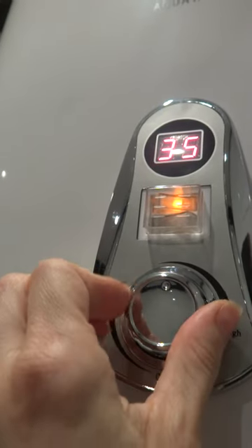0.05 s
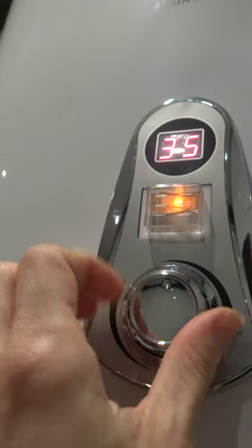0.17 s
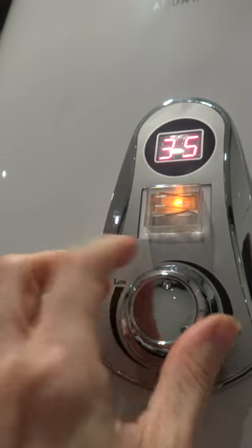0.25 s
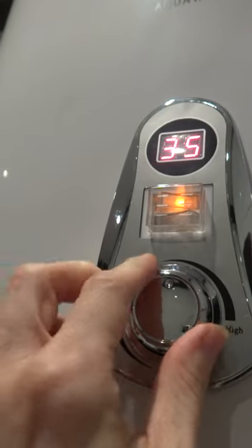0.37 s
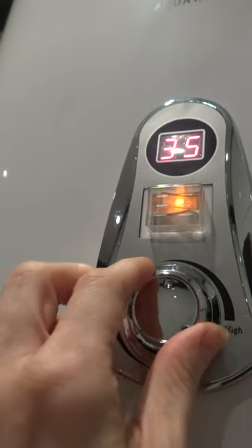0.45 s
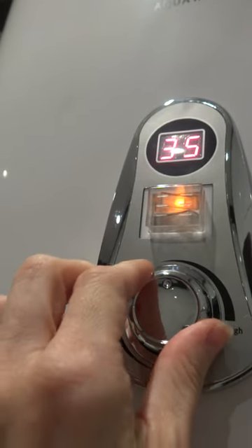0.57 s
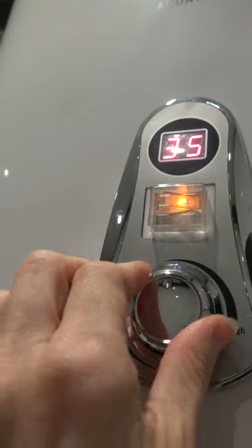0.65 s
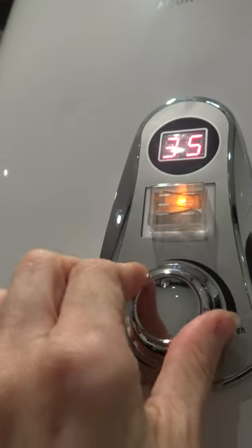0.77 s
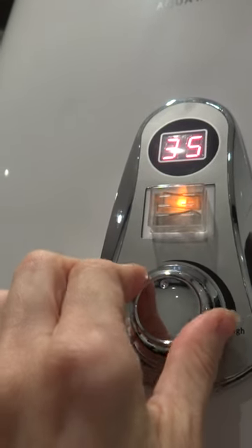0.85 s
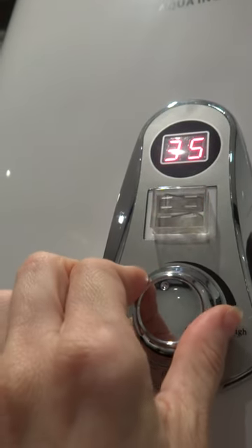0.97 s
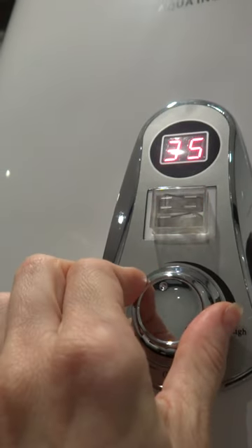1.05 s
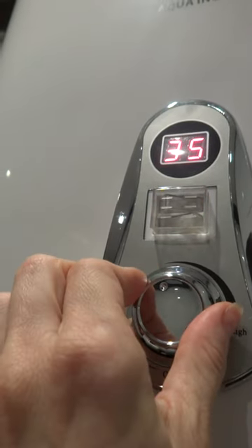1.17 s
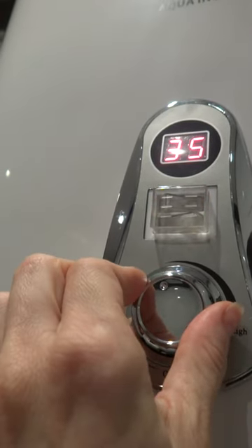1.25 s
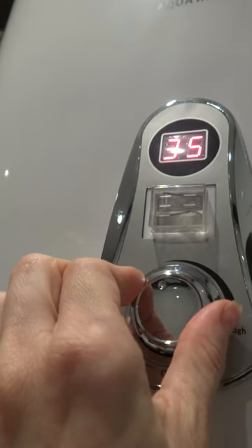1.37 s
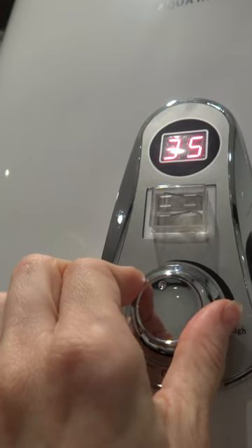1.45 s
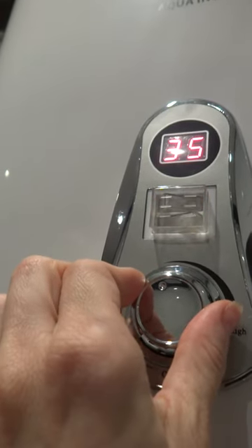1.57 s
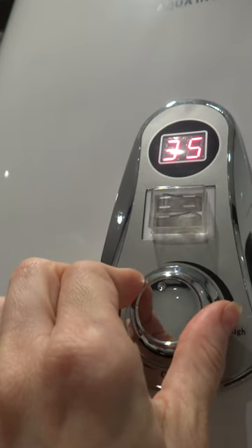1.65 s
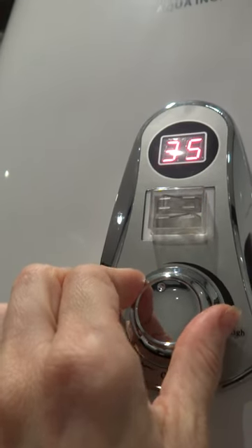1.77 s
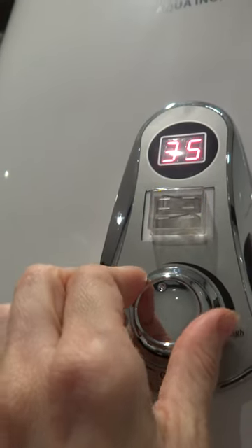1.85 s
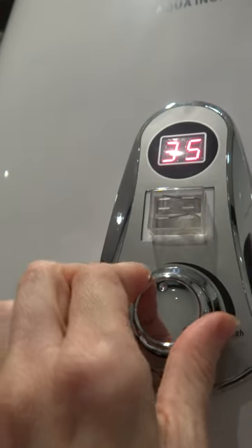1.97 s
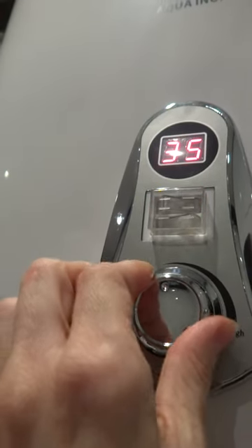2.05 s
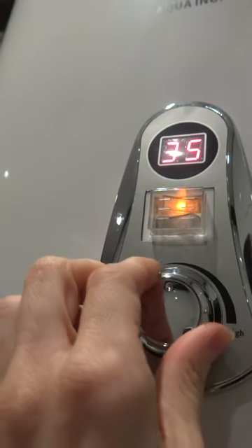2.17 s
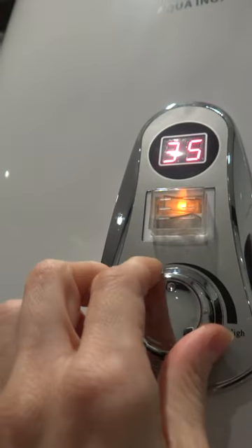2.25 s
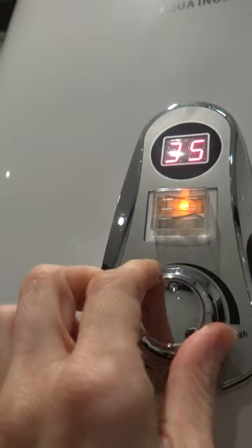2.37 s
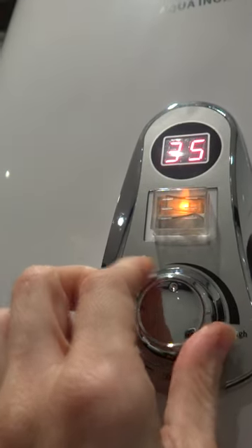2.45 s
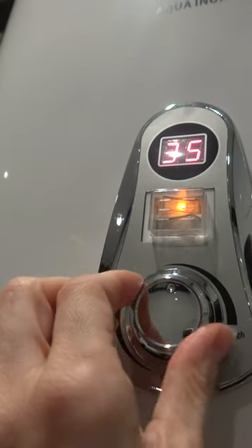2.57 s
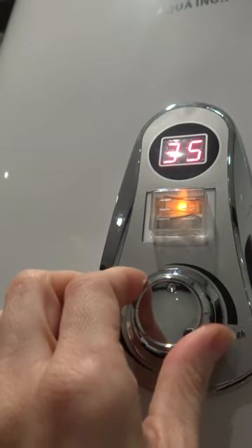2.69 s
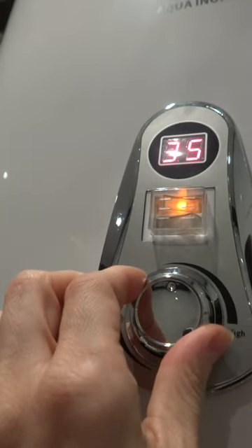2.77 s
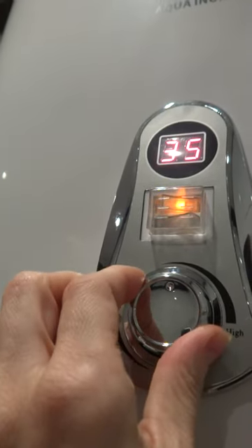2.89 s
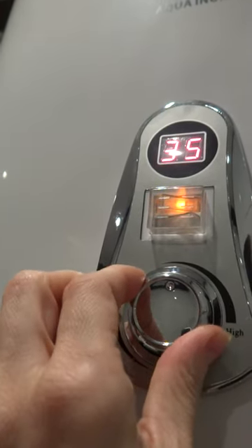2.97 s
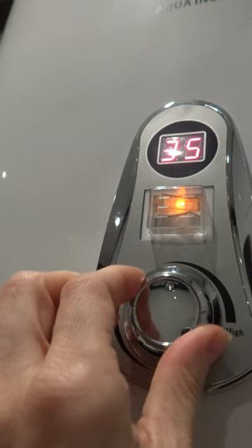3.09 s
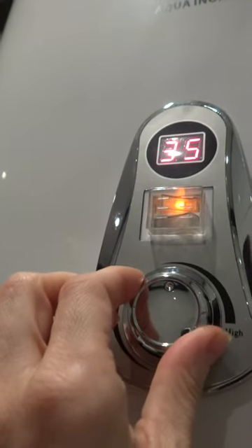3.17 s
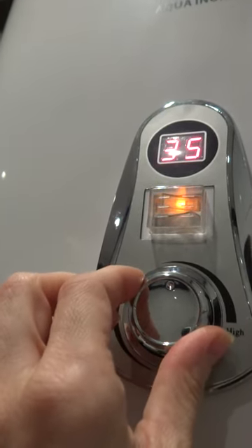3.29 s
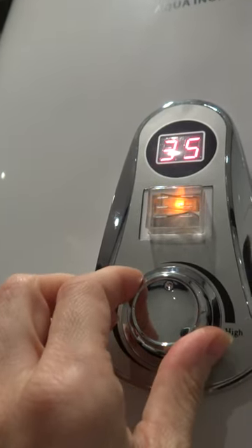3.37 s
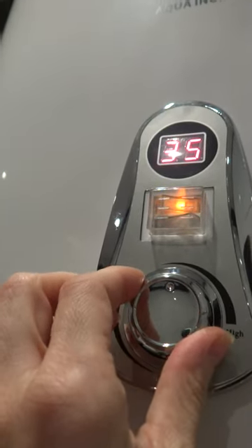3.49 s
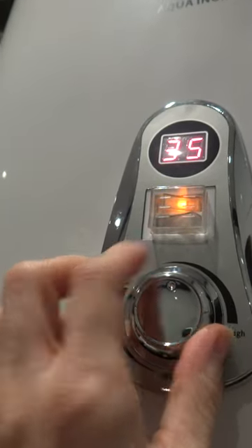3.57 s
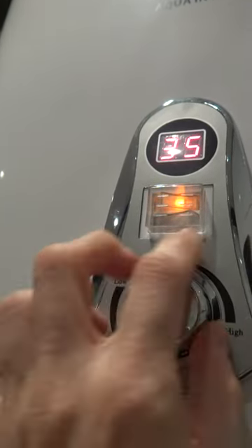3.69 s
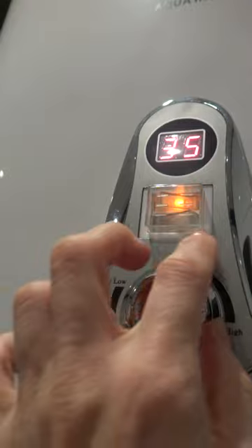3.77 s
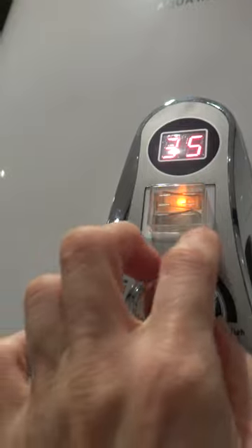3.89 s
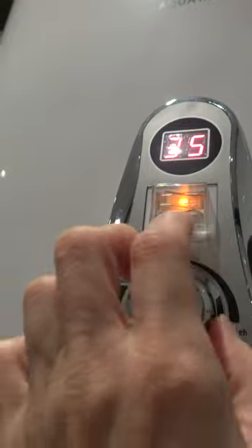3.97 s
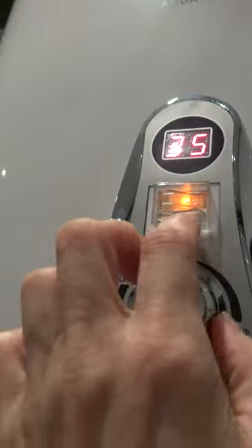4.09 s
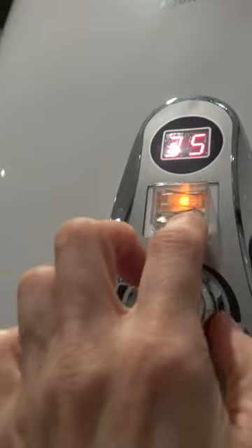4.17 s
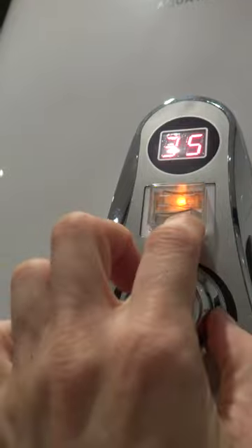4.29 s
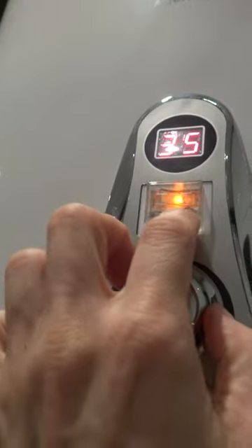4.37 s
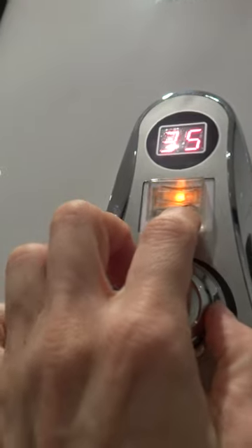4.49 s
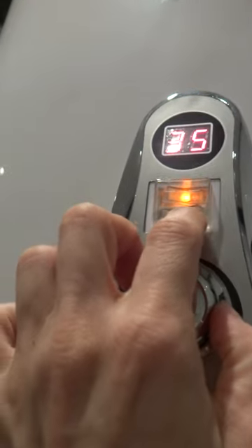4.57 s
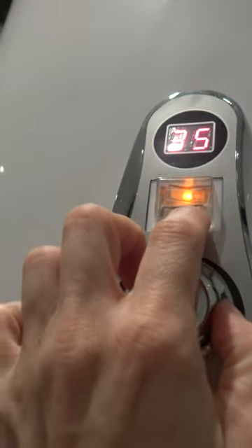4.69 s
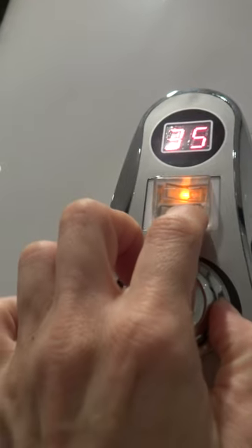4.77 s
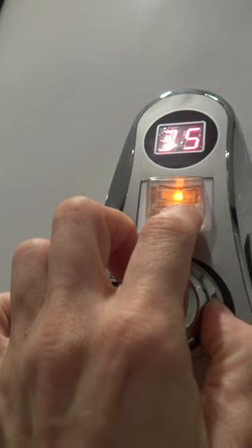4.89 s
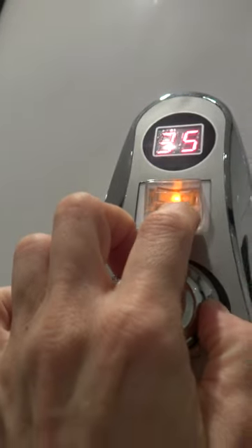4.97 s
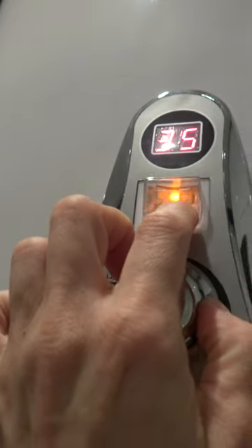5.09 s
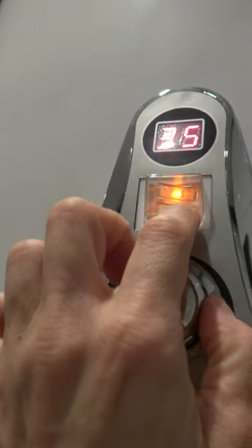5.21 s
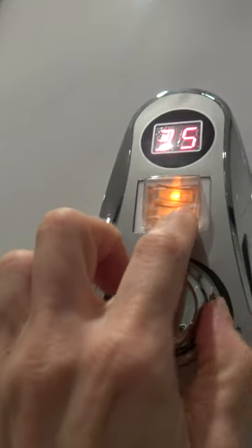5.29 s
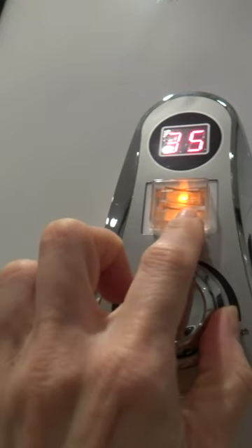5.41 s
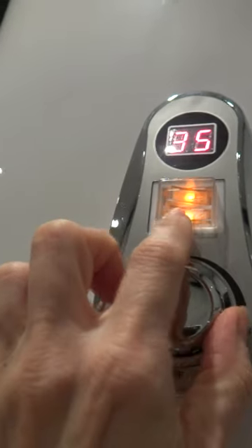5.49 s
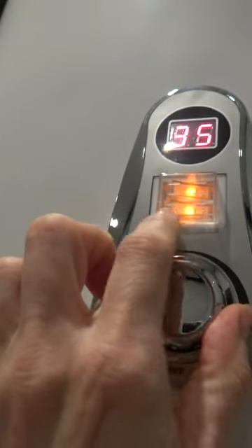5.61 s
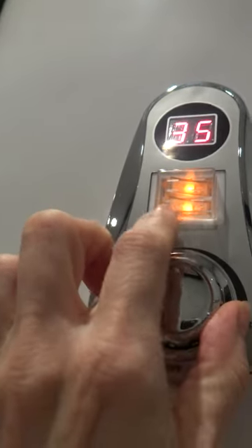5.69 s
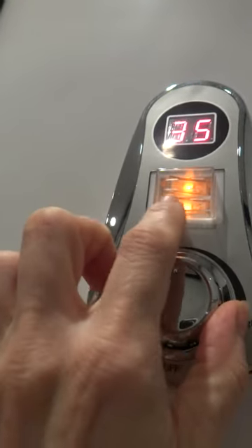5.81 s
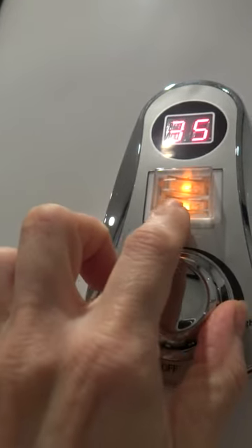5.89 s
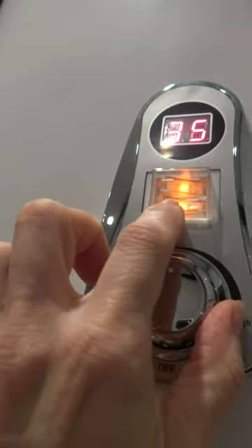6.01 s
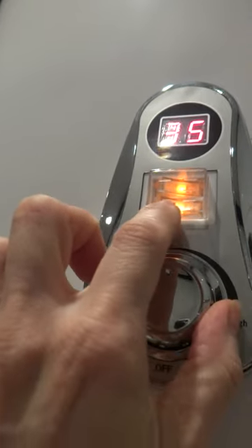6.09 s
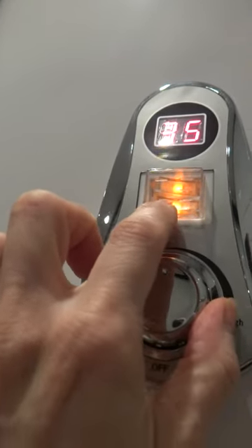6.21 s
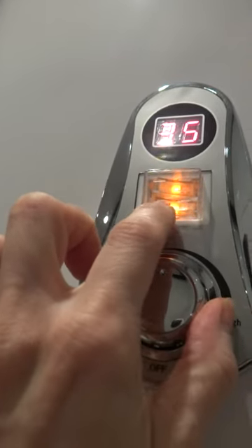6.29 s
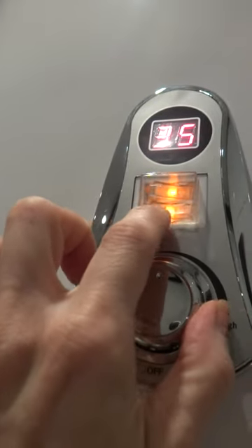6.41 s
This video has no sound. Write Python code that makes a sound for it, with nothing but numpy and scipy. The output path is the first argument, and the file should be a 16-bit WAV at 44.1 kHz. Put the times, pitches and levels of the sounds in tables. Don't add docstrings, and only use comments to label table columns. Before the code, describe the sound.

Close up in a hard, tiled room, fingers softly knock and rub a hollow plastic panel. A knob snaps off with a sharp bright click, then snaps on about a second later. After quiet fumbling and small creaks, a rocker switch gives a heavier, far more ringing clack. A distant clock ticks once a second under faint microphone hiss.

```python
import sys
import numpy as np
from scipy import signal
from scipy.fft import rfft, irfft, next_fast_len
from scipy.io import wavfile
from scipy.ndimage import uniform_filter1d

SR = 44100
rng = np.random.default_rng(int(sys.argv[2]) if len(sys.argv) > 2 else 0)


def pcm_store(signal):
    levels = np.round(np.clip(np.atleast_2d(signal), -1, 1) * 32767)
    wavfile.write(sys.argv[1], SR, levels.astype(np.int16).T)


def invert_db(x):
    u = np.asarray(x, float) / 20
    return 10 ** u


N = 284445

# start in seconds, direct level in dB, rise in seconds, rattle in seconds.
SNAPS = [
    (0.9781, -20.5, 0.00051, 0.0087),
    (2.1994, -16, 0.00041, 0.0048),
    (4.943, -17, 0.00034, 0.006),
]
# frequency in Hz, level in dB per Hz.
ROCKER_COLOUR = [(180, -57.5), (300, -29), (478, -16.5), (913, -14), (1110, -3.5), (1380, -14.5),
                 (1770, -8), (3390, -14), (4970, -31), (8460, -29), (15900, -44)]
# frequency in Hz, width in Hz, level in dB.
NAIL = [(3000, 780, 8), (6640, 1600, 7.5), (11000, 5300, 1.5)]
# frequency in Hz, left over right in dB.
HIT_LEAN = [(60, -1), (180, -0.5), (550, -5), (1400, -6), (3000, -4.5), (6000, -2.5), (10000, -1.4),
            (15000, -1)]
# frequency in Hz, left over right in dB.
RING_LEAN = [(60, -1), (150, 0), (380, -1), (700, -3.5), (1290, -4.5), (2380, -3), (4400, -2.5),
             (8100, -.7), (15000, 0)]
HISS_TOP_HZ = 15930


def unit(x):
    return x / np.sqrt(np.mean(x ** 2) + 1e-24)


def along(points, hz):
    f, v = np.transpose(points)
    return np.interp(np.log(hz + 1), np.log(f + 1), v)


def filtered(x, response):
    m = next_fast_len(x.shape[-1] + 8192)
    spectrum = rfft(x, m) * response(np.fft.rfftfreq(m, 1 / SR))
    return irfft(spectrum, m)[..., :x.shape[-1]]


def modes(table):
    return lambda f: sum((-1) ** k * invert_db(db) * 1j * f * w / (c * c - f * f + 1j * f * w)
                         for k, (c, w, db) in enumerate(table))


def blended(peaks, colour, colour_db):
    damped = [(c, np.hypot(w, 20 + (c / 580) ** 2), db - 6.5) for c, w, db in peaks]
    return lambda hz: np.hypot(abs(modes(damped)(hz)), invert_db(along(colour, hz) + colour_db))


def leaned(x, lean, late=0):
    # frequency in Hz, phase in radians by which the left leads.
    port_lead = [(60, 0), (430, -0.7), (1100, -0.45), (1700, -0.1), (3700, 0.15), (8000, 0)]

    def response(hz):
        gain = invert_db(np.outer([.5, -.5], along(lean, hz)))
        return gain * np.exp(1j * late * np.outer([.5, -.5], along(port_lead, hz)))
    return filtered(x, response)


def spread(pair, alike, lean, late=0):
    def mixing(hz):
        turn = np.arccos(np.clip(along(alike, hz), -1, 1)) / 2
        return np.array([np.cos(turn), np.sin(turn)])
    mid, side = filtered(pair, mixing)
    return leaned(np.array([mid + side, mid - side]), lean, late)


def add(out, s, x):
    i = round(s * SR)
    out[..., i:i + x.shape[-1]] += x[..., :N - i]


def strokes(rows, rise, fall):
    t = np.arange(N) / SR
    return sum(invert_db(db - rise * np.maximum(s - t, 0) - fall * np.maximum(t - s - hold, 0)) for s, hold, db in rows)


def ringing(response, build, lasting):
    # frequency in Hz, decay by 60 dB in seconds.
    room_t60 = [(100, 0.28), (260, 0.59), (700, 0.69), (1840, 0.61), (4850, 0.55), (12800, 0.45)]
    # frequency in Hz, left-right likeness.
    ring_alike = [(60, .95), (350, .8), (800, .95), (2000, .96), (6000, .94), (15000, .99)]
    ragged_db = 1.8
    n = SR * 3 // 5
    noise = filtered(rng.standard_normal((2, n)), lambda hz: response(hz) * (hz < HISS_TOP_HZ))
    pair = spread(noise, ring_alike, RING_LEAN, late=1)
    hz, t, z = signal.stft(pair / np.std(pair), SR, nperseg=256)
    ragged = uniform_filter1d(rng.standard_normal(z.shape[1:]), size=4, axis=0)
    ragged = unit(uniform_filter1d(ragged, size=5, axis=1))
    decay_db = -60 * t / (lasting * along(room_t60, hz)[:, None])
    fading = signal.istft(z * invert_db(ragged_db * ragged + decay_db), SR, nperseg=256)[1][:, :n]
    return fading * (1 - np.exp(-np.arange(n) / SR / build))


def snaps():
    # frequency in Hz, width in Hz, level in dB.
    off_hit = [(814, 200, -22), (1780, 26, -2), (3500, 83, 5.5), (5230, 180, -12), (6030, 78, -8.5),
               (7430, 260, -9.5), (8220, 100, -5), (10450, 450, -11), (11970, 270, -11.5), (12500, 180, -9),
               (14200, 330, -8), (15500, 200, -28)]
    on_hit = [(875, 180, -8), (2700, 105, -14), (3502, 23, 9), (6570, 150, -10), (9640, 204, -33),
              (10380, 400, -3.5), (11250, 260, -4.5), (12960, 370, -3), (15500, 344, -30), (14400, 300, -4)]
    rocker_hit = [(1150, 270, -3.5), (1800, 71, 3.5), (2850, 1100, -2), (5900, 80, -9.5), (7300, 180, -9),
                  (7900, 79.4, -17), (9800, 98, -21), (10440, 190, -29)]
    # frequency in Hz, width in Hz, level in dB.
    off_ring = [(804, 27, 1), (988, 36, 3), (1283, 18, -4), (1746, 46, -3), (2360, 37, -7.5),
                (3200, 56, -4), (3510, 20, -1), (4470, 71, -12), (5080, 81, -10.5), (5930, 33, -18),
                (7200, 74, -15.5), (8140, 95, -16), (10430, 31, -22.5), (13400, 75, -23), (15600, 120, -38)]
    on_ring = [(1070, 110, 0.5), (1283, 16, 4), (1570, 61, -5.5), (2250, 190, -4.5), (2770, 53, -4),
               (3500, 62, -6), (3800, 110, -7), (5100, 140, -10.5), (6380, 110, -11), (9800, 27, -17),
               (10330, 440, -14), (11600, 37, -17), (12300, 153, -27), (14100, 51, -17)]
    rocker_ring = [(1120, 38, 0), (1713, 53, 5), (2240, 85, -0.5), (2360, 40, -0.5), (2800, 31, -3.5),
                   (3360, 110, -4.5), (3860, 100, -12), (4400, 39, -10), (5760, 46, -20), (7700, 28, -29),
                   (7950, 71, -25), (8250, 34, -22.5), (9500, 600, -29.5)]
    # frequency in Hz, level in dB per Hz.
    off_colour = [(35, -51), (60, -33), (379, -17.5), (921, -8), (1540, -24), (1690, -27), (3330, -10.5),
                  (4010, -23), (5070, -33), (15900, -35)]
    on_colour = [(35, -47), (60, -56), (222, -12.5), (696, -14.5), (1060, -14), (1370, -27), (3490, -15.5),
                 (7020, -32), (14100, -24), (15900, -31)]
    # ring in dB, build-up in seconds, factor on t60, broad colour in dB, loose cover in dB.
    rings = [
        (-35.5, 0.00067, 0.97, -3, -35),
        (-38.5, 0.0018, 0.97, -3, -39),
        (-19, 0.034, 0.83, -3, -20),
    ]
    # start in seconds, level in dB, t60 in seconds.
    lead_in = [
        (.9778, -50, .02),
        (2.1992, -48, .005),
        (4.94, -34.5, 0.01),
        (4.9411, -20.5, 0.0064),
    ]
    shake_s = .075

    out, t = np.zeros((2, N)), np.arange(SR // 20) / SR
    ring_t = np.arange(SR * 3 // 5) / SR
    small = lambda hz: (hz / 350) ** 2 / (1 + (hz / 350) ** 2)
    parts = zip(SNAPS, rings, (off_hit, on_hit, rocker_hit), (off_ring, on_ring, rocker_ring),
                (off_colour, on_colour, ROCKER_COLOUR))
    for (s, db, rise, rattle), (ring_db, build, lasting, diffuse_db, shake_db), hit, ring, colour in parts:
        chatter = rng.standard_normal(len(t)) * np.exp(-(t / rattle) ** 2)
        blow = 6 * np.exp(-((t - .0003) / .00006) ** 2)
        struck = filtered(chatter + blow, lambda hz: small(hz) * (modes(hit)(hz) + invert_db(-29.0)))
        envelope = (1 - np.exp(-t / rise)) * (0.13 + np.exp(-(t / rattle) ** 4)) * invert_db(-60 * t / 0.08)
        struck = struck * envelope
        add(out, s, leaned(invert_db(db) * struck / abs(struck).max() * np.ones((2, 1)), HIT_LEAN, late=1))
        shaking = 1 + invert_db(shake_db) * np.exp(-(ring_t / shake_s) ** 6)
        add(out, s, invert_db(ring_db) * shaking * ringing(blended(ring, colour, diffuse_db), build, lasting))
    for s, db, t60 in lead_in:
        tick = filtered(rng.standard_normal(len(t)), modes(NAIL + [(14000, 1400, 3.06)]))
        tick = tick * (1 - np.exp(-t / 0.00032))
        add(out, s, invert_db(db - 60 * t / t60) * tick * np.ones((2, 1)))
    return out


def tank():
    # frequency in Hz, level in dB, t60 in seconds.
    tap_notes = [(2050, -63.5, 0.32), (3350, -64.5, .35), (3950, -68, 0.26), (7000, -71, .3),
                 (11500, -69, 0.089)]
    off_notes = [(750, -51, 0.36), (946, -48.5, 0.81), (1057, -51, 0.53), (1690, -43, 0.35),
                 (3140, -55, 0.45), (3467, -53, 0.36), (5300, -56, 0.49), (7445, -61, .33),
                 (8080, -59, 0.66), (10490, -62, .36), (11760, -58, .25), (12680, -60, .29),
                 (13780, -59, .3)]
    on_notes = [(1050, -48, 0.41), (1287, -43.5, 0.41), (1186, -54, 0.27), (2720, -66, .45),
                (3460, -52, 0.46), (5233, -59, 0.55), (6508, -73, .5), (9927, -60, .34), (10550, -60, .33),
                (11930, -57, .2), (12400, -64, .4), (14100, -56, .4)]
    rocker_notes = [(1039, -35, 0.448), (1125, -36.5, 0.68), (1196, -41, 0.36), (1740, -32, .35),
                    (1910, -37, .3), (1890, -32, .25), (2132, -34.5, 0.51), (2158, -32, 0.413),
                    (2380, -31, 0.45), (2870, -49, .34), (3788, -34, 0.38)]
    note_build = [
        .002,
        .004,
        0.0035,
        0.009,
    ]
    tap_s = .436
    waver_db, waver_radians = 4, .9
    early_db, early_t60, early_from_hz = -46, .2, 4000

    out, t = np.zeros((2, N)), np.arange(SR // 2) / SR
    blows = zip([(tap_s,)] + SNAPS, (tap_notes, off_notes, on_notes, rocker_notes), note_build)
    for (s, *_), notes, build in blows:
        wander = uniform_filter1d(rng.standard_normal((2, len(notes), len(t))), size=350)
        waver, drift = uniform_filter1d(wander, size=350)
        hz, db, t60 = np.transpose(notes)[..., None]
        phase = 2 * np.pi * (hz * t + rng.random(hz.shape)) + waver_radians * unit(drift)
        ring = invert_db(db - 60 * t / t60 + waver_db * unit(waver)) * np.sin(phase)
        add(out, s, leaned(ring.sum(0) * (1 - np.exp(-t / build)) * np.ones((2, 1)), RING_LEAN, late=1))
    bright = lambda hz: invert_db(along(ROCKER_COLOUR, hz)) / (1 + (early_from_hz / (hz + 1)) ** 4)
    add(out, SNAPS[-1][0], invert_db(early_db) * ringing(bright, 0.0009, early_t60))
    return out


def thumps():
    # centre in seconds, frequency in Hz, level in dB, half length in seconds.
    flexes = [
        (0.9808, 872, -19.5, 0.0012),
        (2.198, 960, -40, 0.00061),
        (4.944, 1120, -30.5, 0.0017),
        (4.9448, 765, -32.5, 0.0018),
        (.4385, 700, -44.5, 0.0016),
        (.981, 12300, -37, 0.0017),
        (.984, 14000, -36, .0012),
        (2.2005, 10600, -33, .0008),
        (4.956, 2035, -33, .002),
    ]
    # centre in seconds, frequency in Hz, level in dB, half length in seconds.
    slaps = [(2.308, 1140, -48, 0.0016), (2.318, 1150, -48, 0.0014), (2.351, 1210, -42, 0.001),
             (2.36, 1430, -43.5, 0.0013), (2.368, 1720, -49, 0.0017), (4.9615, 2050, -22, 0.0012),
             (4.97, 1980, -25.5, 0.00052), (4.963, 1800, -31, .0006), (5.003, 1756, -25, 0.0049),
             (5.033, 1120, -28, 0.0016)]
    # centre in
    # seconds, frequency in Hz, level in dB, half length in seconds.
    chirps = [(4.2745, 2620, -58, 0.0011), (4.2745, 1500, -59, 0.0008), (4.29, 2510, -56, .005),
              (4.314, 2540, -60, 0.0043), (4.33, 2550, -59, .002), (4.362, 1900, -59, .003),
              (4.375, 2560, -56, 0.0065), (4.555, 2700, -58, 0.0025), (4.563, 2730, -67, 0.0017),
              (4.571, 2660, -52, 0.0016), (4.586, 2570, -55, 0.0014), (4.595, 2800, -61, .002),
              (4.602, 2800, -61, 0.0022), (.215, 714, -52, 0.0028), (.213, 3550, -61, .002),
              (.477, 720, -52, 0.0025), (.17, 2490, -66, .004), (.415, 1410, -55, .006),
              (3.39, 1450, -64, 0.0038), (4.346, 1480, -53.5, 0.0047), (1.37, 3180, -57, .006),
              (1.39, 3250, -58, 0.0027), (1.417, 3100, -59, .003), (5.4, 1820, -63.5, 0.0094)]
    out, t = np.zeros(N), np.arange(-SR // 100, SR // 100) / SR
    for s, hz, db, half in flexes + slaps + chirps:
        add(out, s + t[0], invert_db(db) * np.exp(-(t / half) ** 2 / 2) * np.cos(2 * np.pi * hz * t))
    return leaned(out * np.ones((2, 1)), HIT_LEAN, late=1)


def booms():
    # mode's frequency in Hz, swell rate in swells per second, level in dB, t60 in seconds.
    standing = [(71, 3.8, -26.5, 0.37), (105.4, 6, -19, 0.49), (130.7, 7.3, 4.5, 0.54),
                (152.8, 4.2, -18, 0.98), (224.2, 5.5, -7.5, 0.65), (255, 25, -10.5, 1)]
    # start in seconds, level in dB, upper waves in dB, factor on swell speed.
    blows = [
        (0.062, -52, 6, 0.79),
        (0.13, -50, -3.5, 1.24),
        (0.437, -57, 3.5, 1.03),
        (0.979, -62.5, 8.5, 0.5),
        (2.197, -63, 12, 1.1),
        (3.967, -65, -18, 0.94),
        (4.094, -57, 5, 0.97),
        (4.943, -39.5, 2.5, 0.86),
    ]
    out, t = np.zeros((2, N)), np.arange(SR // 2) / SR
    for s, db, upper_db, speed in blows:
        for hz, swell_rate, mode_db, t60 in standing:
            swell = np.sin(np.pi * np.minimum(speed * swell_rate * t, 1)) + 0.39 * (1 - np.exp(-t / 0.0051))
            wave = np.sin(2 * np.pi * (hz * t + rng.random()))
            wave = wave * invert_db(1.95 * unit(uniform_filter1d(rng.standard_normal(len(t)), size=500)))
            fade_db = db + mode_db + upper_db * (hz > 170) - 60 * t / t60
            add(out, s, invert_db(fade_db) * swell * wave * invert_db([[-.4], [.4]]))
    return out


def fingers():
    # start in seconds, nail tick in dB, plastic knock in dB, top of the knock in Hz.
    touches = [(.064, -84, -50, 795), (.13, -80, -54.5, 502), (.212, -78, -52.5, 900),
               (.436, -57, -41, 9000), (0.474, -75, -70, 1200), (2.119, -78, -61, 1000),
               (2.491, -76, -65.5, 1490), (2.578, -79, -61.5, 905), (3.859, -62, -67, 3000),
               (3.872, -58.5, -65, 9000), (3.967, -76, -62, 3000), (4.091, -76, -56.5, 260),
               (4.162, -79, -63, 700), (4.654, -61, -59.5, 4000), (5.93, -70, -68, 4000)]
    # frequency in Hz, width in Hz, level in dB.
    casing = [(275, 40, 3.5), (700, 260, -0.5), (2100, 83, 3), (3570, 130, 7.5)]
    out, t = np.zeros((2, N)), np.arange(SR // 20) / SR
    for s, tick_db, knock_db, top_hz in touches:
        body = lambda hz: modes(casing)(hz) / (1 + 1j * hz / top_hz) ** 2
        tick = filtered(invert_db(-60 * t / 0.011) * rng.standard_normal(len(t)), modes(NAIL))
        knock = filtered(np.exp(-((t - .0002) / .00003) ** 2), body)
        contact = invert_db(tick_db) * tick + invert_db(knock_db + 7.0) * knock / abs(knock).max()
        add(out, s, contact * invert_db([[-1.2], [1.2]]))
        add(out, s, invert_db(knock_db - 8.5) * ringing(lambda hz: body(hz) / (1 + (hz / 1800) ** 2), 0.00051, 0.68))
    return out


def rubbing():
    # start in seconds, hold in seconds, level in dB.
    turn = [(.12, .01, -82), (.205, 0.012, -80), (.67, 0.12, -71.5), (.94, 0.025, -77),
            (1.88, 0.041, -79.5), (2.11, 0.06, -72)]
    # frequency in Hz, width in Hz, level in dB.
    seat = [(810, 220, 0), (2230, 150, 1), (3553, 135, 1.5), (14300, 990, -23)]
    # start in seconds, hold in seconds, level in dB, thinned below in Hz.
    slides = [
        (4.563, 0.056, -65.5, 3500),
        (4.686, 0.04, -65.5, 7500),
    ]
    # frequency in Hz, level in dB per Hz.
    skin_colour = [(2000, 12), (4000, -3), (8000, -10.5), (11000, -14), (15500, -21.5)]
    # start in
    # seconds, level in dB, frequency in Hz, width in Hz, factor on t60.
    soft_rings = [(.0, -65.5, 4400, 300, 0.46), (.0, -68, 2000, 468, 0.72), (.0, -59.5, 855, 200, 0.43),
                  (.15, -64, 2140, 350, 1.2), (4.549, -54, 2750, 311, 0.85), (4.68, -63.5, 3000, 1214, 1.7)]
    # start in
    # seconds, level in dB, frequency in Hz, width in Hz, factor on t60.
    quick_rings = [(1.327, -63, 3200, 40, 0.93), (4.2737, -61.5, 2570, 60, 1.7), (4.355, -58.5, 1940, 300, 1.06),
                   (5.354, -66, 650, 30, 0.82), (6.351, -56.5, 1380, 118.6, 0.79),
                   (.35, -61.5, 2290, 1200, 0.56), (4.57, -55.5, 2700, 150, 0.5)]
    # frequency in Hz, level in dB per Hz.
    creak_colour = [(500, -16), (1500, -4), (3500, -14), (5000, -29), (13000, -40)]

    rough = invert_db(1.8 * unit(uniform_filter1d(rng.standard_normal(N), size=300)))
    drag = unit(filtered(rough * rng.standard_normal(N), modes(seat))) * strokes(turn, 200, 240) * invert_db(5.0)
    slide = 0
    for *stroke, low_hz in slides:
        thinned = lambda hz: invert_db(along(skin_colour, hz)) / (1 + (low_hz / (hz + 1)) ** 3)
        slide = slide + unit(filtered(rng.standard_normal(N), thinned)) * strokes([stroke], 430, 150)
    out = (drag + slide) * invert_db([[-.8], [.8]])
    for rows, build_s in ((soft_rings, 0.01), (quick_rings, 0.0024)):
        for s, db, hz, width, lasting in rows:
            add(out, s, invert_db(db) * ringing(blended([(hz, width, 0)], creak_colour, -15), build_s, lasting))
    return out


def clock():
    # start in seconds, level in dB, case in dB, wheel in dB, rattle in dB.
    ticks = [(0.348, -52, -6, -12, -8), (1.346, -54.5, 1, -3, 6), (2.353, -52.5, -18, -9, -0.5),
             (3.347, -55.5, 9, 2, 13), (4.346, -52, 1, -9, -11), (5.344, -49, 3, -7.5, 0),
             (6.349, -54.5, 3, -16, 2)]
    # release in dB, note in dB.
    pawl = [(-12, -4.5), (-6, -3.5), (-3, -7), (-10.5, 3.5), (-14, -11), (-11, -2), (-8.5, 3.5)]
    # frequency in Hz, width in Hz, level in dB.
    clock_peaks = [(697, 46, -9), (1107, 44, -4.5), (1420, 49, -1), (1803, 20, 0.5), (2310, 28, -6),
                   (2596, 42, -3.5), (3200, 190, 0.5), (3770, 79, -1), (6350, 180, -14)]
    # frequency in Hz, level in dB per Hz.
    clock_colour = [(400, -24.5), (900, -15), (1500, -3), (3500, -7), (6500, -13), (7200, -18), (9000, -20),
                    (13000, -33)]
    case_top_hz, wheel_from_hz = 1300, 3000
    pawl_lead_s, ping_lead_s = 0.027, 0.00407
    ping_hz, ping_db, ping_t60, ping_beat_hz = 1443, -2.5, 0.38, 22

    out, t = np.zeros((2, N)), np.arange(SR // 5) / SR
    ping = np.sin(np.pi * ping_beat_hz * t + .6) * np.sin(2 * np.pi * ping_hz * t) * (1 - np.exp(-t / 0.0039))
    for (s, db, case_db, wheel_db, rattle_db), (release_db, note_db) in zip(ticks, pawl):
        peaks = [(hz, w, top + case_db * (hz < case_top_hz) + wheel_db * (hz > wheel_from_hz))
                 for hz, w, top in clock_peaks]
        voice = blended(peaks, clock_colour, rattle_db - 13.0)
        add(out, s - pawl_lead_s, invert_db(db + release_db) * ringing(voice, 0.0053, 0.44))
        add(out, s, invert_db(db) * ringing(voice, 0.011, 0.91))
        fade = invert_db(db + ping_db + note_db - 60 * t / ping_t60)
        add(out, s - ping_lead_s, fade * ping * invert_db([[-1.5], [1.5]]))
    return out


def handling():
    # start in seconds, hold in seconds, level in dB.
    grip = [
        (0, 0.043, -65),
        (2.15, .08, -68),
        (4.6, 0.49, -65),
    ]
    thud = filtered(rng.standard_normal(N), lambda hz: modes([(72, 45, 0)])(hz) ** 2)
    gain = invert_db(-79.5) + strokes(grip, 72, 57)
    return invert_db(-7.0) * gain * unit(thud) * np.ones((2, 1))


def air():
    # frequency in Hz, level in dB per Hz.
    hiss_colour = [(12, -50), (20, -65), (91, -3.5), (177, -7.5), (222, -8), (293, -3), (328, -4.5),
                   (434, -4.5), (574, -3), (780, -4.5), (3740, -15), (12100, -26), (16000, -31)]
    # frequency in Hz, left-right likeness.
    air_alike = [(60, 0.83), (150, 0.43), (380, -0.41), (950, -0.72), (2380, -0.26), (5980, 0.45),
                 (15000, 0.97)]
    # frequency in Hz, level in dB per Hz.
    pipes = [(100, -9), (200, -7), (320, -8.5), (600, -13), (1000, -12.5), (2500, -36.5)]
    # start in seconds, hold in seconds, level in dB.
    swells = [(0, 0.47, -69.5), (2.35, .1, -73), (3.45, 0.16, -76), (4.1, 0.25, -69.5), (5.1, 0.077, -63.5)]
    # start in seconds, hold in seconds, level in dB.
    groan = [
        (3.3, 0.32, -73.5),
    ]
    even = [(100, 0.0091), (10000, 0.012)]  # (Hz, left over right dB)

    hiss = filtered(rng.standard_normal((2, N)), lambda hz: invert_db(along(hiss_colour, hz)) * (hz < HISS_TOP_HZ))
    hiss = spread(hiss, air_alike, even)
    low = filtered(rng.standard_normal((2, N)), lambda hz: invert_db(along(pipes, hz)))
    low = spread(low, air_alike, even)
    unsteady = invert_db(2.8 * unit(uniform_filter1d(rng.standard_normal(N), size=4000)))
    murmur = (invert_db(-76.5) + strokes(swells, 59, 27)) * invert_db(2.5) * unsteady * unit(low)
    hum = unit(filtered(rng.standard_normal(N), lambda hz: modes([(300, 110, 0)])(hz) ** 2))
    return strokes(groan, 56, 56) * hum + invert_db(-64.5) * unit(hiss) + murmur


def whine():
    # frequency in Hz, width in Hz, level in dB.
    bands = [(7650, 250, -93.5), (11970, 300, -88)]
    return sum(invert_db(db) * unit(filtered(rng.standard_normal(N), modes([(hz, w, 0)]))) for hz, w, db in bands)


def scene():
    struck = snaps() + tank() + thumps() + booms()
    return struck + fingers() + rubbing() + clock() + handling() + air() + whine()


def band_limit(x):
    return signal.sosfilt(signal.butter(12, 16670, fs=SR, output="sos"), x)


def record(dry):
    top_hz = 16300

    def phone_band(hz):
        bass_cut = (1j * hz / 40 / (1 + 1j * hz / 40)) ** 2
        return np.clip((top_hz + 300 - hz) / 900, 0, 1) * bass_cut
    passed = filtered(dry, phone_band)
    top = filtered(passed, lambda hz: hz > HISS_TOP_HZ)
    quiet = uniform_filter1d(abs(top).max(0), size=256) < invert_db(-75)
    return band_limit(passed - top * quiet)


dry = scene()
out = record(dry)
pcm_store(out)
```